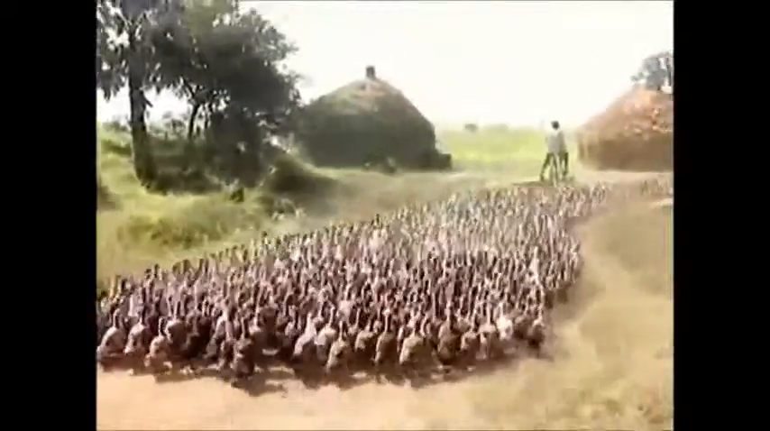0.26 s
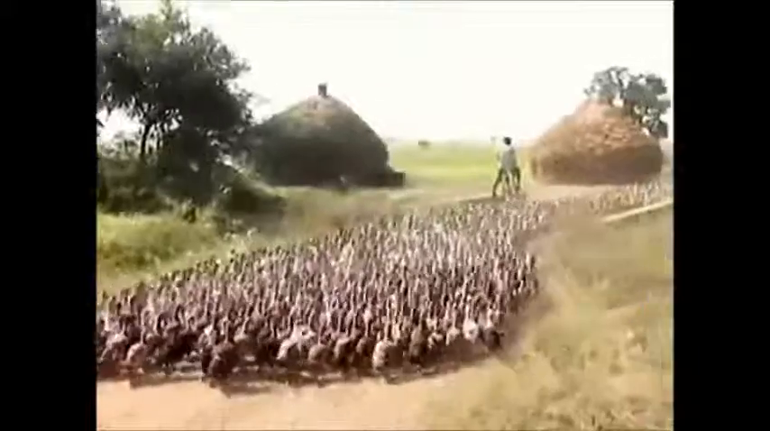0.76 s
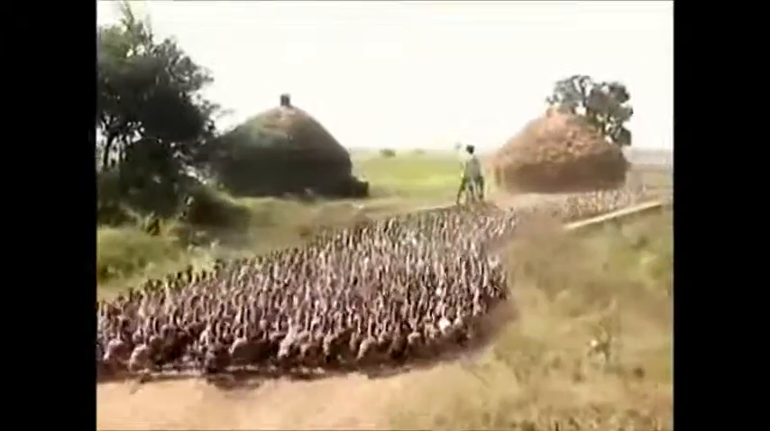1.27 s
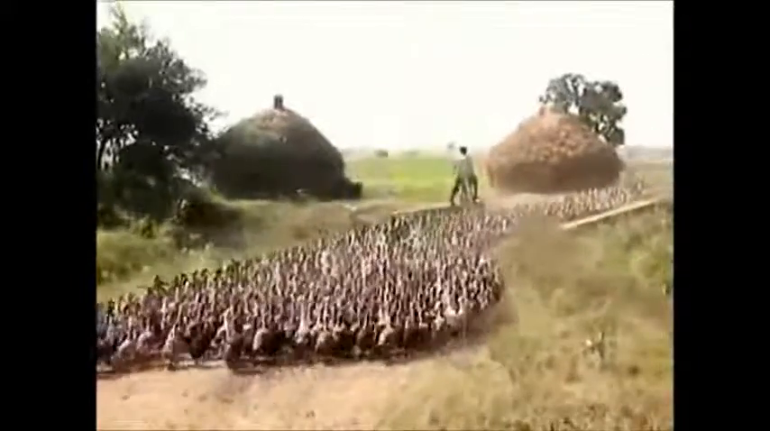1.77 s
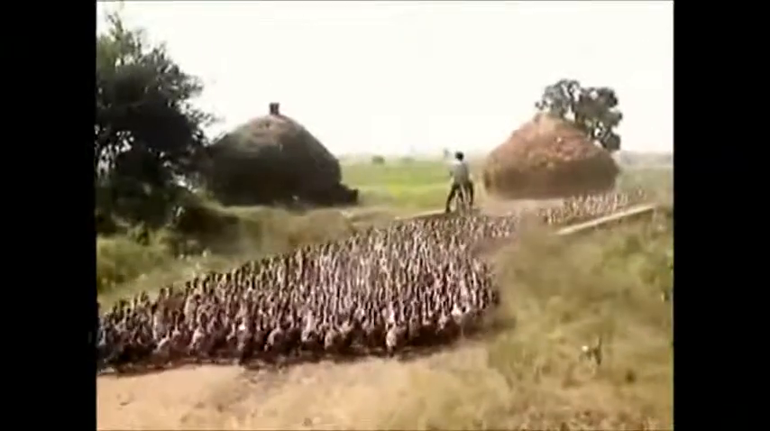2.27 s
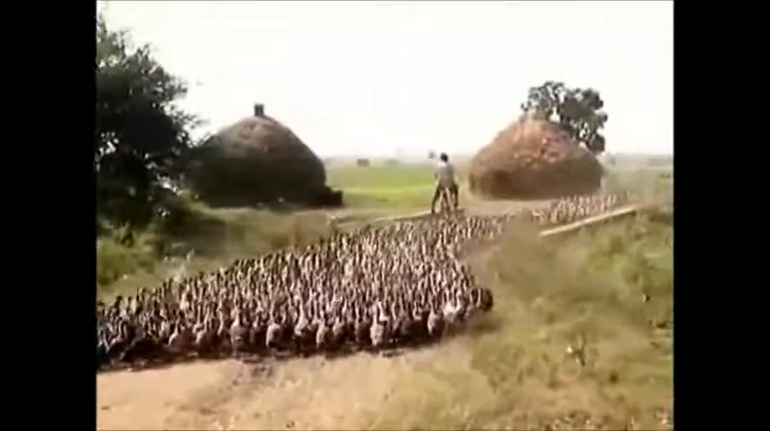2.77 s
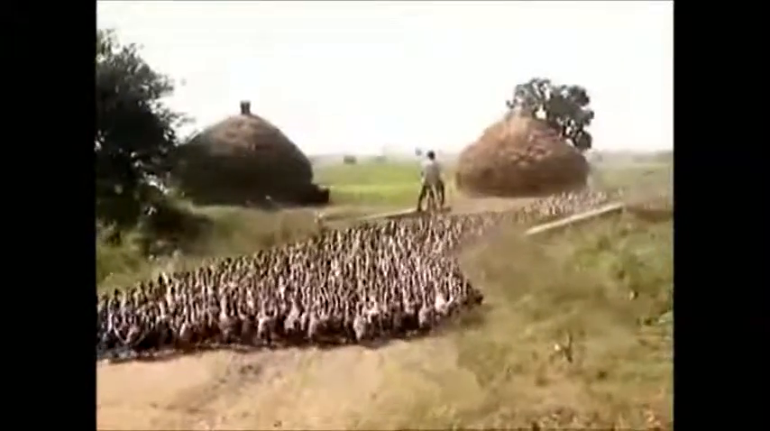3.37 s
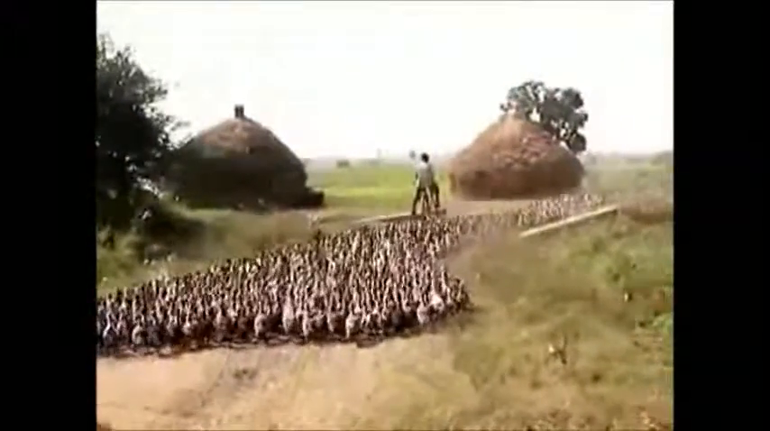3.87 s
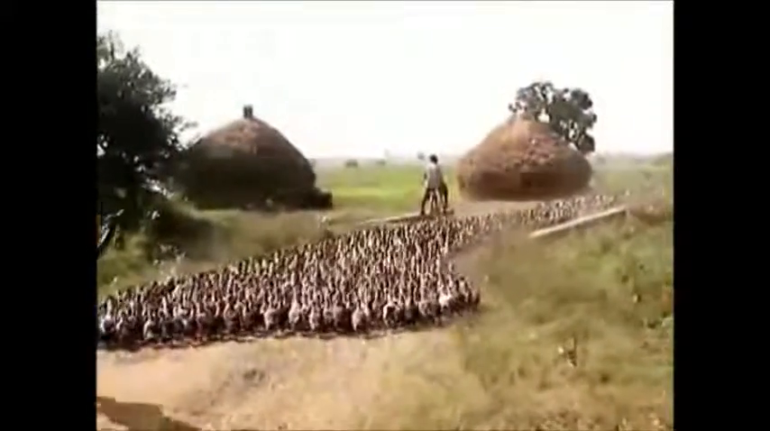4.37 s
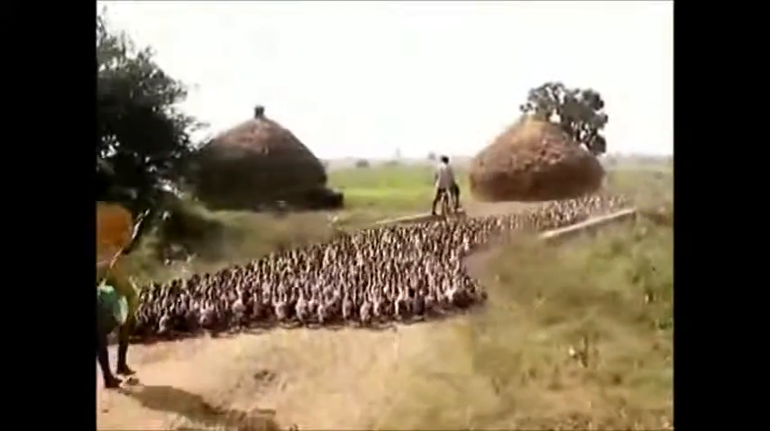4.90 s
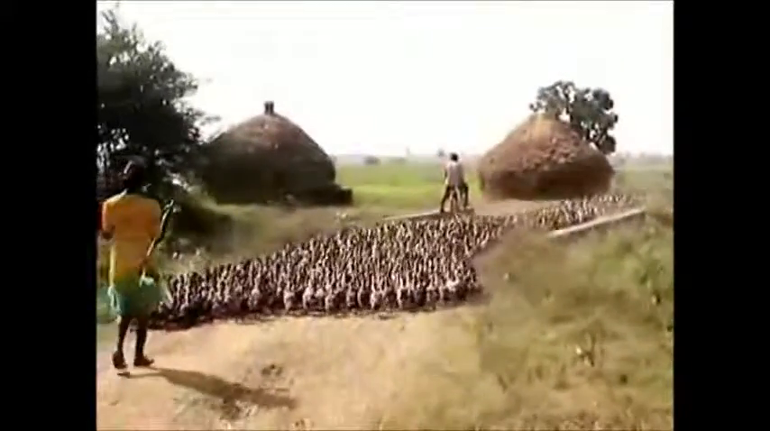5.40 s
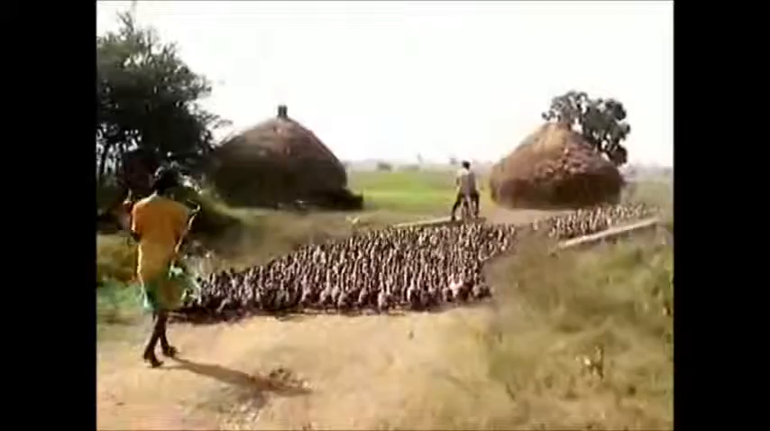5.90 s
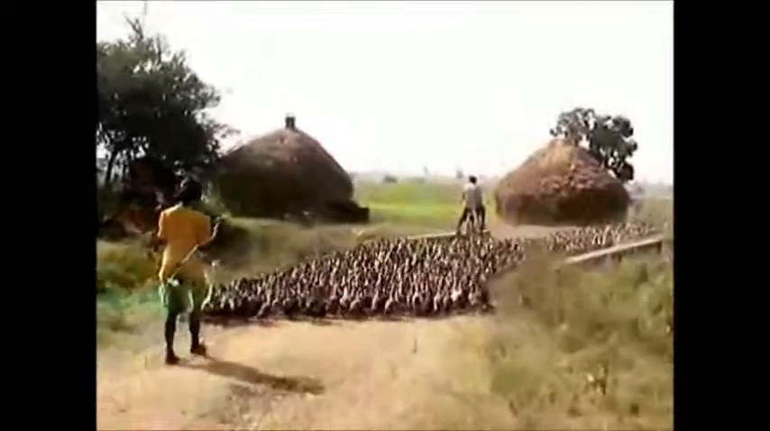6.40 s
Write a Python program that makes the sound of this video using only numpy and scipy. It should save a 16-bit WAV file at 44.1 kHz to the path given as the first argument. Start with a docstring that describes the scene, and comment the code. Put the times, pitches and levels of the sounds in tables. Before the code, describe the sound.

Strong, uneven wind buffets an unprotected microphone from start to end, with fluttering rumble, breathy rush, hiss, small ticks and hard low thuds. Behind it hundreds of ducks babble in overlapping raspy quacks, somewhat dulled by distance, with single closer birds rising briefly. The flock swells near two and a half seconds and thins toward the end, while wind thumps crowd together after four seconds. Open air, no echo.

```python
"""A big flock of ducks on a village road: hundreds of quacks, pulses ringing a throat, merge into one chatter.
A few nearer birds stand out of it.
Gusty wind, made of coloured noise, rushes over the camera, buffets its microphone and hisses;
it also crackles in sharp noise ticks and now and then thumps in short low swings, under a flickering treble.
The two channels are mostly opposite in polarity, the left one louder."""
import sys
import numpy as np
from scipy import signal
from scipy.fft import rfft, irfft, next_fast_len
from scipy.io import wavfile
from scipy.ndimage import uniform_filter1d, map_coordinates

SR = 44100
rng = np.random.default_rng(int(sys.argv[2]) if len(sys.argv) > 2 else 0)


def bounce(signal):
    """Save signal as a 16-bit WAV file at the path given by the first command-line argument."""
    frames = np.transpose(np.atleast_2d(signal))
    limited = np.clip(frames, -1, 1)
    pcm = np.round(limited * 32767).astype(np.int16)
    wavfile.write(sys.argv[1], SR, pcm)


N = 293247

# single strong eddies that thump the microphone:
# (time [s], envelope peak level [dB], pitch [Hz], rush level of the puff of air around it [dB])
EDDY_THUMPS = [(0.231, -5.5, 160.0, -30.5), (0.396, -13, 193, -36), (0.75, -16, 212.0, -25.5),
               (0.778, -10, 89, -37), (0.986, -11.5, 164, -26), (1.14, -10.5, 202, -29.5),
               (1.32, -15, 220, -24.5), (1.496, -16, 141.0, -32), (1.968, -11.5, 153.0, -52),
               (2.228, -7, 164.0, -31), (2.289, -10, 153.0, -36), (2.792, -10, 191.0, -30.5),
               (3.01, -7, 163, -30), (3.355, -11.5, 143, -30.5), (4.013, -4.5, 205, -31),
               (4.132, -19, 152.0, -35), (4.353, -10.5, 134, -34), (4.576, -9, 159.0, -28.5),
               (4.698, -3, 235, -31.5), (5, -14, 182, -28.5), (5.048, -8, 200.0, -36.5),
               (5.204, -9, 199.0, -37), (5.271, -12, 169.0, -33), (5.639, -6.5, 125.0, -39.0),
               (5.879, -3.5, 137.0, -34), (6.029, -6, 177, -36), (6.204, -5.5, 202, -31),
               (6.483, -9, 155, -34)]
QUACK_HZ = 230.3  # middle pitch of the calls, before each bird's own offset


def amp(db):
    """Decibels to gain."""
    return 10 ** (np.asarray(db) / 20)


def unit(x):
    """Scale to rms 1."""
    return x / np.sqrt(np.mean(x ** 2) + 1e-20)


def along(points, hz):
    """Read (Hz, value) points on a log frequency axis."""
    point_hz, values = np.transpose(points)
    return np.interp(np.log(hz + 1), np.log(point_hz + 1), values)


def curves(rows):
    """One value per sample for each column after the time."""
    times, *columns = np.transpose(rows)
    return [np.interp(np.arange(N) / SR, times, column) for column in columns]


def wobble(rate):
    """A smooth random curve with rate knots a second."""
    knots = rng.standard_normal(int(N * rate / SR) + 4)
    return map_coordinates(knots, [np.arange(N) * rate / SR])


def filtered(x, response):
    """Shape the spectrum of x by a response given as a function of frequency."""
    size = next_fast_len(N + 8192)
    spectrum = rfft(x, size) * response(np.fft.rfftfreq(size, 1 / SR))
    return irfft(spectrum, size)[..., :N]


def microphone(pair):
    """Mix two unrelated signals into partly opposed left and right; their mean has rms 1."""
    # likeness of the two channels: (frequency [Hz], correlation [-1 to 1])
    alike = [(40, -0.64), (150, -0.8), (290, -0.78), (400, -0.67), (800, -0.59), (1500, -0.7),
             (2800, -0.62), (4500, -0.44), (6500, -0.29)]
    # level of left over right: (frequency [Hz], level [dB])
    balance = [(60, 5), (500, 5.5), (1200, 5), (2500, 5), (6000, 2.5)]

    def mid_side_gains(hz):
        angle = np.arccos(np.clip(along(alike, hz), -1, 1)) / 2
        return np.array([np.cos(angle), np.sin(angle)])

    def left_right_gains(hz):
        return amp(np.outer([.5, -.5], along(balance, hz)))

    mid, side = filtered(pair, mid_side_gains)
    both = filtered(np.array([mid + side, mid - side]), left_right_gains)
    return both / np.std(both.mean(axis=0))


def patchy_noise(window, bins, patchy_db, limits=(-np.inf, np.inf)):
    """Two channels of noise sharing random gain patches, smoothed over some bins and 8 frames."""
    grid = signal.stft(rng.standard_normal((2, N)), nperseg=window)[2]
    field = uniform_filter1d(rng.standard_normal(grid.shape[1:]), size=bins, axis=0)
    field = uniform_filter1d(field, size=8, axis=1)
    gain = amp(patchy_db * np.clip(unit(field), *limits))
    return signal.istft(grid * gain, nperseg=window)[1][:, :N]


def sizzle(centre_hz=9300, width_hz=560, flicker_db=11):
    """The top of the treble, a band of patchy noise, flickers and comes and goes."""
    # level of the top treble band: (time [s], level [dB])
    treble = [(0, -53), (.7, -46), (.85, -59), (1.03, -46), (1.2, -69), (1.31, -42), (1.55, -63.5),
              (1.8, -49), (2.05, -55.5), (2.25, -60), (2.6, -67.5), (2.77, -54.5), (3.15, -49),
              (3.7, -65.5), (4.0, -51.5), (4.22, -73.5), (4.35, -50), (4.85, -63), (5.2, -47),
              (5.35, -79.5), (5.63, -51), (5.8, -56.5), (6.65, -54)]
    patches = patchy_noise(1024, 5, flicker_db, limits=(-2, 1.2))
    band = filtered(patches, lambda hz: np.exp(-((hz - centre_hz) / width_hz) ** 4))
    return amp(curves(treble)[0]) * band / np.std(band.mean(axis=0))


def swell(crest_s, seconds, steepness=2.1, lean=0.081):
    """Rise and quicker fall of a gust, puff or lull around its crest."""
    # steepness: 2 is a bell, more steepens the flanks; lean: share that lengthens rise, shortens fall
    u = np.linspace(-3, 3, 121)
    leaning = u - lean * np.abs(u)
    shape = np.exp(-np.abs(u) ** steepness)
    return np.interp(np.arange(N), SR * (crest_s + leaning * seconds / 2), shape, left=0, right=0)


def airflow(puff_s=0.023, puff_rumble_db=3, puff_hiss_db=-5):
    """Gains of rumble, rush and hiss: breeze, gusts and puffs add up in power; lulls scale all three."""
    # breeze between the gusts:
    # (time [s], rush level [dB], rumble over rush [dB], hiss over rush [dB])
    breeze = [(0.0, -34.5, 3.5, -3), (0.5, -33.5, 1.5, 4.0), (0.93, -40.5, 8, 6), (1.2, -37.5, 1, 5),
              (1.5, -40.5, 4.5, 3.0), (1.93, -39, 3.5, 0), (2.3, -35.5, -5, 1.5), (2.75, -39.5, 1, 5),
              (3.3, -33, 4, 0.5), (3.65, -39, 0.5, 1.5), (4.3, -38.0, 2.5, 1), (4.9, -35.5, 3, -1),
              (5.3, -30, 2.5, -3.5), (5.54, -35, 1, -1), (5.9, -30, -0.5, 0.5), (6.27, -35, 1, 2),
              (6.65, -33.5, 0.5, 1)]
    # gusts that swell and fade over the camera:
    # (crest time [s], length [s], rush level [dB], rumble over rush [dB], hiss over rush [dB])
    gusts = [(0.019, 0.11, -36.5, 3.5, 2.5), (0.113, 0.055, -40, -6.5, 10.5),
             (0.26, 0.039, -37.5, 4, -11.5), (0.325, 0.015, -31, -7, 4.5), (0.391, 0.11, -30.5, 5, -3),
             (0.545, 0.044, -29.5, 1.5, 2.5), (0.597, 0.06, -32, 6.5, 3), (0.692, 0.08, -28.5, -11.5, 0.5),
             (0.752, 0.094, -30, 5.5, -2.0), (0.845, 0.076, -35, 2, -10), (1.044, 0.1, -54, 9, 17),
             (1.125, 0.076, -36, -4.5, 4), (1.243, 0.055, -30.5, -3, -3), (1.316, 0.074, -28, -1, -0.5),
             (1.396, 0.05, -42, -10, 9), (1.74, 0.087, -39.5, 8.5, 1.5), (1.785, 0.038, -31.0, -6.0, 7),
             (1.823, 0.046, -29, 1, 4), (2.019, 0.033, -36, 5.5, 2), (2.27, 0.035, -30, 2.5, -3.5),
             (2.372, 0.086, -31.5, 2, -3), (2.529, 0.114, -30, 2, -3.5), (2.642, 0.14, -32.0, 1.5, -11),
             (2.843, 0.087, -40.5, 2, 6), (2.952, 0.2, -39, 5.5, 2), (3.145, 0.111, -35, -1.5, 3.5),
             (3.269, 0.092, -32.5, -11, 4.0), (3.505, 0.14, -35, 0, -0.5), (3.917, 0.074, -39.5, 2, 5),
             (4.091, 0.11, -40, 8, 5), (4.206, 0.031, -48, 16.5, -15), (4.383, 0.046, -34, 5.5, -9.0),
             (4.601, 0.095, -32.5, 4.5, 2), (4.721, 0.097, -32.5, 4.5, 3.5), (4.811, 0.062, -32, 4.0, -5),
             (5.045, 0.091, -40, 4, 8), (5.146, 0.06, -37.5, 1, 6), (5.229, 0.11, -31, 5.5, 4),
             (5.373, 0.053, -32.5, -3, -0.5), (5.66, 0.097, -29.5, 5.5, 1.5), (5.767, 0.065, -33, 3, 1.5),
             (5.852, 0.032, -31, 4.5, 1.5), (5.933, 0.056, -32, 6.5, -6), (6.109, 0.028, -34.5, 6, 3),
             (6.193, 0.043, -28, 4.5, -9.5), (6.374, 0.075, -34, 7.5, -1), (6.507, 0.051, -40, 14, -6),
             (6.619, 0.12, -35, 2, 1.5)]
    # short lulls in the wind, a negative depth being a lift: (time [s], length [s], depth [dB])
    lulls = [(0.193, 0.054, 2.5), (0.307, 0.026, 0), (0.942, 0.028, 1), (1.363, 0.02, 2.5),
             (1.47, 0.026, 2), (1.93, 0.063, 1.5), (2.3, 0.014, 4), (2.77, 0.04, 2.5), (3.061, 0.014, 3.5),
             (3.973, 0.016, 2.5), (4.302, 0.045, -1), (5.555, 0.026, -1), (6.266, 0.025, 2.5)]

    def layer_levels(rush_db, rumble_db, hiss_db):
        return amp([rush_db + rumble_db, rush_db, rush_db + hiss_db])

    power = layer_levels(*curves(breeze)) ** 2
    puffs = [(s, puff_s, rush_db, puff_rumble_db, puff_hiss_db) for s, _, _, rush_db in EDDY_THUMPS]
    for s, seconds, *levels in list(gusts) + puffs:
        power += np.outer(layer_levels(*levels) ** 2, swell(s, seconds))
    lull_db = sum(depth_db * swell(s, seconds) for s, seconds, depth_db in lulls)
    return np.sqrt(power) * amp(-lull_db)


def turbulence(spectrum, patchy_db):
    """Stereo noise of the given colour, with patches of random gain."""
    pair = patchy_noise(512, 7, patchy_db)
    return microphone(filtered(pair, lambda hz: amp(along(spectrum, hz))))


def wind(rumble_gain, rush_gain, hiss_gain):
    """Small eddies shake rumble, rush and hiss together; the rumble also breaks into lumps of its own."""
    # colour of the low buffeting: (frequency [Hz], relative level per Hz [dB])
    buffet_colour = [(15, -15), (35, -12.5), (70, -6), (120, 0.5), (200, 0), (275, 1), (320, -9.5),
                     (380, -13.5), (600, -29), (1500, -95.5)]
    # colour of the rush: (frequency [Hz], relative level per Hz [dB])
    rush_colour = [(100, -8), (300, -7.5), (450, 1.5), (850, 2), (1300, 0.5), (2000, -7.5), (2800, -7.5),
                   (4500, -16.5), (6500, -27), (7500, -91)]
    # colour of the hiss: (frequency [Hz], relative level per Hz [dB])
    hiss_colour = [(500, -14), (1500, 3), (2600, 1), (4000, -1), (5500, -2.5), (6300, -5.5), (6900, -12.5),
                   (7400, -26.5)]
    eddies = wobble(70)
    lumps = amp(-0.1 + 1.0 * eddies + 1.93 * np.clip(wobble(36), -2, 1))
    buffet = rumble_gain * lumps * turbulence(buffet_colour, patchy_db=-0.74)
    rush = rush_gain * amp(-1.06 + 0.94 * eddies) * turbulence(rush_colour, patchy_db=2.5)
    hiss = hiss_gain * amp(-0.32 + 0.94 * eddies) * turbulence(hiss_colour, patchy_db=1.5)
    return buffet + rush + filtered(hiss, lambda hz: 1 / (1 + (hz / 7000) ** 70))


def crackle(hiss_gain, count=260, over_hiss_db=17, spread_db=1.5, decay_s=0.00027):
    """Wind crackles on the microphone: a few sharp noise ticks, and many small ones that grow with the hiss."""
    # sharp ticks: (time [s], peak level before the treble cut [dB])
    sharp_ticks = [(0.546, -3), (0.668, -18), (0.701, -6), (0.798, -7), (1.112, -9), (1.237, -5),
                   (1.277, -5), (1.303, -6), (1.399, -4), (2.266, -5), (3.192, -5), (3.754, -15),
                   (4.989, -8), (5.761, -4), (6.107, -8), (6.173, -8)]
    out, t = np.zeros(N + SR), np.arange(SR // 200) / SR
    places = rng.integers(0, N, count)
    sizes = np.clip(rng.standard_normal(count), -2, 1.5)
    small = zip(places, hiss_gain[places] * amp(over_hiss_db + spread_db * sizes))
    sharp = [(round(s * SR), amp(db)) for s, db in sharp_ticks]
    band = signal.butter(2, [700, 6000], "band", fs=SR, output="sos")
    for start, gain in sharp + list(small):
        burst = signal.sosfilt(band, rng.standard_normal(len(t)) * np.exp(-t / decay_s))
        out[start:start + len(t)] += gain * burst / np.abs(burst).max()
    soft = filtered(out[:N], lambda hz: 1 / (1 + (hz / 6800) ** 70))
    return np.outer([1, -amp(-11)], soft)  # right is opposed and weaker


def thumps(rise_cycles=0.42, fall_cycles=0.7):
    """A strong eddy strikes the diaphragm abruptly, then pushes and pulls it for a cycle or two."""
    t, push = np.arange(-SR // 10, SR // 10) / SR, np.zeros(N + SR)
    phases = rng.uniform(0, 2 * np.pi, len(EDDY_THUMPS))
    for (s, db, hz, _), phase in zip(EDDY_THUMPS, phases):
        turns = t * hz
        shape = np.exp(-.5 * (turns / np.where(t < 0, rise_cycles, fall_cycles)) ** 2)
        swing = amp(db) * shape * np.cos(2 * np.pi * turns + phase)
        push[round((s + t[0]) * SR):][:len(t)] += swing
    return np.outer([1, -amp(-9.0)], push[:N])  # right is opposed and weaker


def throat(size=1024):
    """The ring of throat and bill after one pulse: resonances of alternating sign, summed."""
    # resonances of a duck's throat and bill: (frequency [Hz], width [Hz], level [dB])
    resonances = [(800, 110, 0), (1680, 230, 1.5), (1938, 220, 7.5), (2320, 670, -1), (3550, 1700, -12.5)]
    f = np.fft.rfftfreq(size, 1 / SR)
    response = 0
    for k, (centre, width, db) in enumerate(resonances):
        damping = 1j * f * width
        response = response + (-1) ** k * amp(db) * damping / (centre * centre - f * f + damping)
    return irfft(response)


def quack(ring, pitch_hz, seconds, scale, fall=0.1586, jitter=.025, rasp=0.26, bill_glide=0.1383):
    """Uneven, airy syrinx pulses ring the throat; its resonances, higher in a small bird, move with the bill."""
    u = np.linspace(0, 1, int(SR * np.clip(seconds, .03, .25)))
    waver = np.interp(u, np.linspace(0, 1, 20), rng.standard_normal(20))
    # dividing by scale here makes up for the faster reading below
    cycle = np.cumsum(pitch_hz / scale * (1 - fall * u * u) * (1 + jitter * waver)) / SR
    pulses = np.diff(np.floor(cycle), prepend=0)
    air = rng.standard_normal(SR // 2)[:len(u)] * (1 - cycle % 1) ** 2  # strongest at each pulse
    voice = signal.fftconvolve(unit(pulses) + rasp * unit(air), ring)[:len(u)]
    shaped = np.sqrt(u) * (1 - u) * voice
    # reading speed sets throat size and lifts pitch and resonances together as the bill opens
    speed = scale * (1 + bill_glide * (np.sin(np.pi * u) - np.pi / 4))
    clock = np.cumsum(1 / speed)
    return unit(np.interp(np.arange(clock[-1]), clock, shaped))


def quacks(count, seconds=.085, size_spread=.065, distance_db=2.0):
    """Short quacks tumble over each other, each of its own pitch, length, throat and level."""
    out, ring = np.zeros(N + 2 * SR), throat()
    starts = SR + ((np.arange(count) + rng.uniform(-2, 1, count)) * N / count).astype(int)
    birds = np.clip(rng.standard_normal((count, 4)), -2, 2)
    for start, (high, long, small, near) in zip(starts, birds):
        pitch_hz = QUACK_HZ * np.exp(.17 * high)
        call = quack(ring, pitch_hz, seconds * np.exp(.25 * long), np.exp(size_spread * small))
        out[start:start + len(call)] += amp(distance_db * near) * call
    return out[SR:SR + N]


def near_ducks():
    """A few birds at the front stand out of the chorus, each with its own throat size and pitch."""
    # nearest quacks: (time [s], level [dB], length before division by the throat scale [s],
    # throat scale [factor on resonances and pitch])
    near_calls = [(0.142, -30, 0.12, 0.85), (1.509, -34, 0.076, 0.85), (1.681, -39, 0.073, 1),
                  (2.126, -34, .08, 1.03), (2.388, -31, 0.074, 1.1), (2.468, -33, 0.12, 1.07),
                  (2.573, -30, 0.072, 1.04), (2.905, -26.5, 0.095, 1.08), (3.117, -29, 0.083, 1.1),
                  (3.543, -30, 0.042, 1.05), (3.687, -33, 0.08, 1.1), (4.077, -33, 0.097, 1.1),
                  (4.4, -38, 0.11, 1.0), (4.913, -30, 0.087, 1.1), (5.375, -31, 0.089, 0.87),
                  (6.268, -31, 0.073, .98)]
    out, ring = np.zeros(N + SR), throat()
    for (s, db, seconds, scale), high in zip(near_calls, rng.standard_normal(len(near_calls))):
        call = quack(ring, QUACK_HZ * scale * np.exp(0.072 * high), seconds, scale)
        out[round(s * SR):][:len(call)] += amp(db) * call
    return np.outer([1, -amp(-10.5)], out[:N])  # right is opposed and weaker


def ducks(dull_hz=4500):
    """The chorus and the birds at its front; distance takes the treble off."""
    # chatter of the flock, before the treble is taken off: (time [s], level [dB])
    chatter = [(0.0, -36.5), (0.9, -38.5), (1.6, -41.5), (2.1, -37.5), (2.45, -31.5), (2.75, -41),
               (3.2, -37.0), (3.8, -41), (4.4, -39.5), (4.95, -40), (5.5, -40), (6.65, -48)]
    chorus = microphone(np.array([quacks(count=200), quacks(count=200)]))
    flock = amp(curves(chatter)[0]) * chorus + near_ducks()
    return filtered(flock, lambda hz: 1 / (1 + (hz / dull_hz) ** 10))


def scene():
    """The flock behind the wind."""
    rumble, rush, hiss = airflow()
    return ducks() + wind(rumble, rush, hiss) + thumps() + crackle(hiss) + sizzle()


def record(dry, ceiling=.97, top_hz=10100):
    """The camera rounds off the largest peaks and keeps nothing above its band limit."""
    rounded = dry / (1 + np.abs(dry / ceiling) ** 8) ** (1 / 8)
    return filtered(rounded, lambda hz: hz < top_hz)


dry = scene()
out = record(dry)
bounce(out)
```